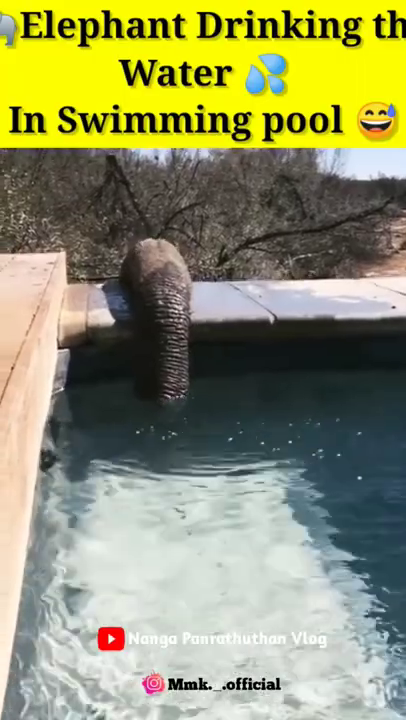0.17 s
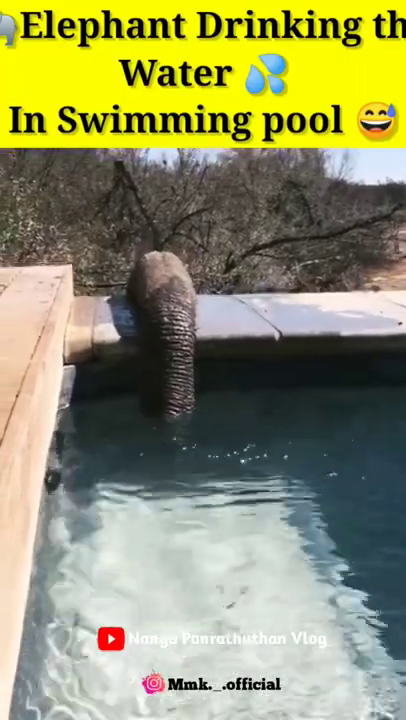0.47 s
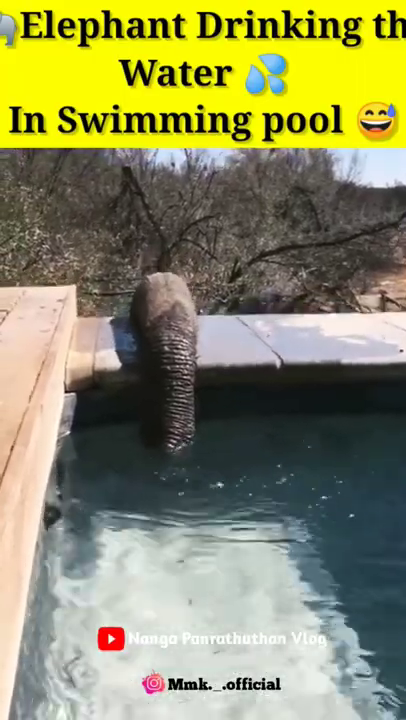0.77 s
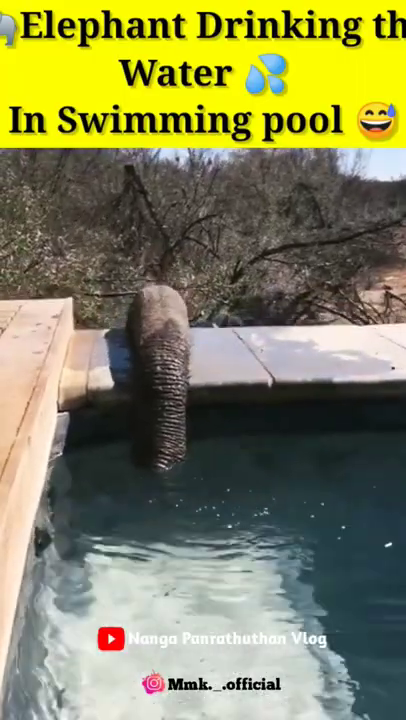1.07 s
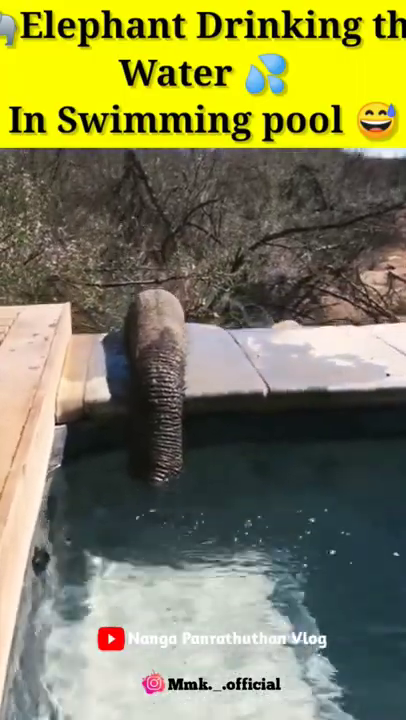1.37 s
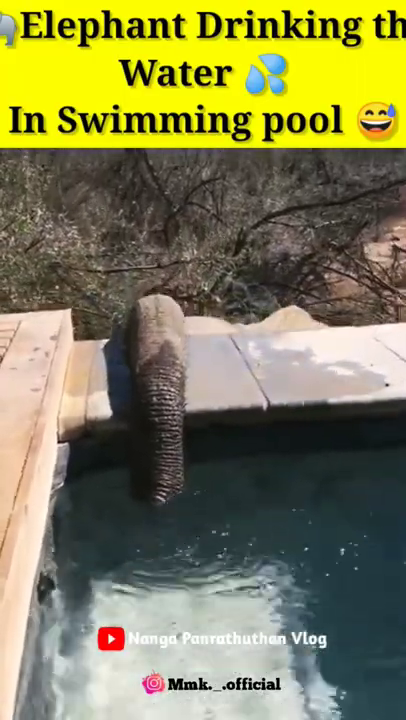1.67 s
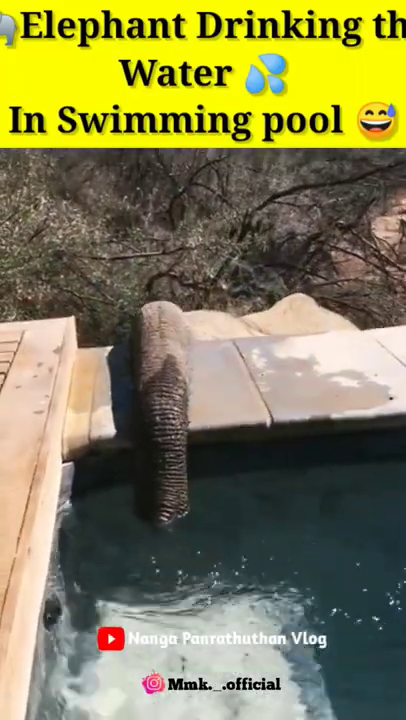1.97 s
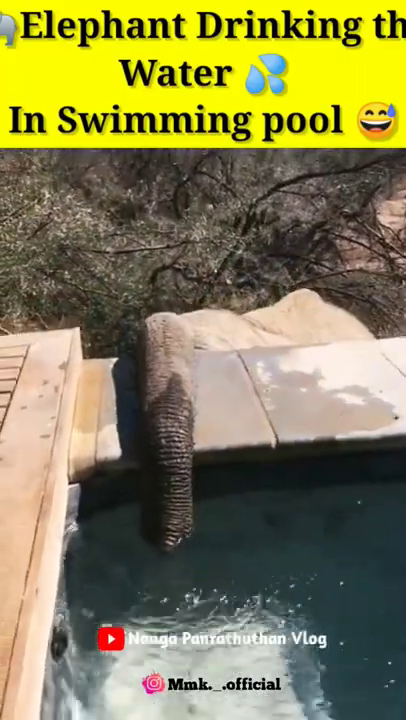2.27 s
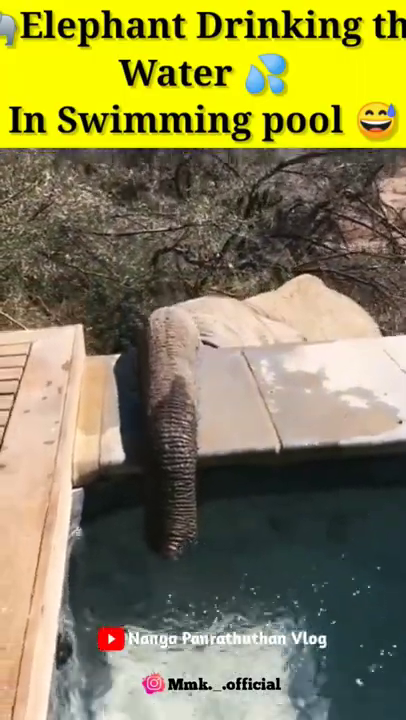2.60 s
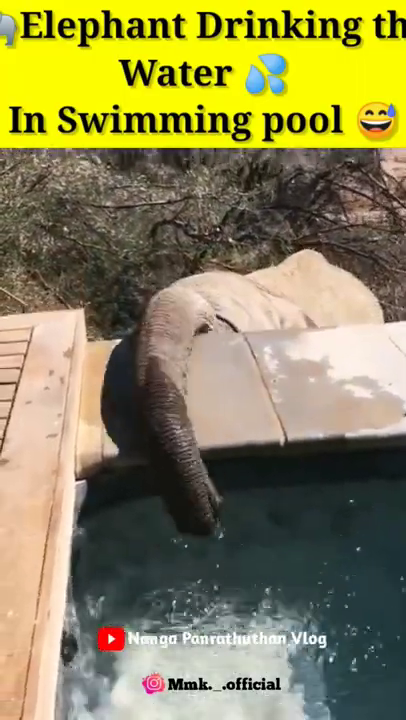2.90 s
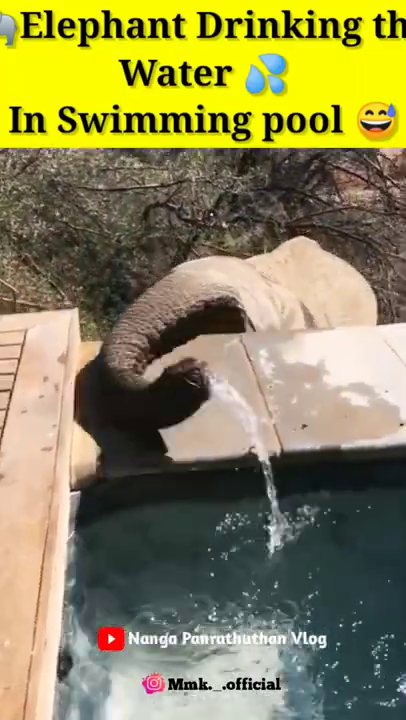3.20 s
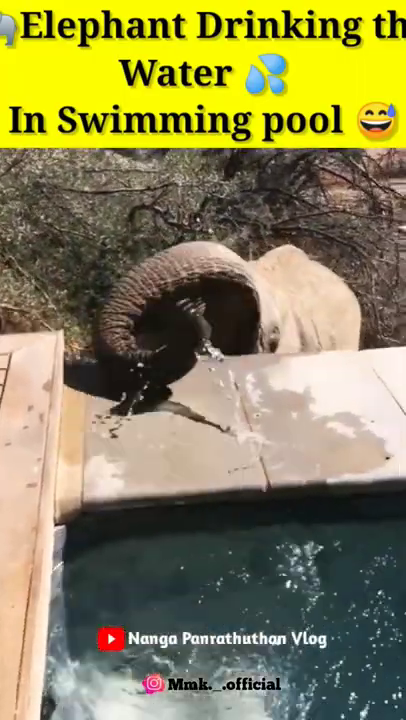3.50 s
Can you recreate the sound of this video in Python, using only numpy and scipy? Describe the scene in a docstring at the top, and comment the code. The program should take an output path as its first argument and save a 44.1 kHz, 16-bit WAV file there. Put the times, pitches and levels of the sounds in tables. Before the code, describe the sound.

Shrill cicada buzz throughout, with faint gurgles, soft wind bumps and a final splashing of water.

```python
"""Cicadas drone all round in dry bush, over faint gurgles and a plop from a pool; light wind bumps
the microphone. An elephant's trunk stirs the water, then lifts out: one big bubble, and water spills
and spatters on the pool and the stone edge. Cicadas are trains of clicks plus hiss, wind is low noise,
water is ringing grains and gliding tones blurred by pool echoes. One microphone, both channels alike."""
import sys
import numpy as np
from scipy import signal
from scipy.fft import rfft, irfft, next_fast_len
from scipy.io import wavfile

SR = 44100
rng = np.random.default_rng(int(sys.argv[2]) if len(sys.argv) > 2 else 0)


def int16_out(signal):
    """Quantize to a 16-bit WAV file."""
    q = np.round(np.clip(np.atleast_2d(signal).T, -1, 1) * 32767)
    wavfile.write(sys.argv[1], SR, q.astype(np.int16))


N = 160965  # length in samples

# Colour tables are relative: the shaped noise is scaled to rms 1 before its level is set.
# Loudness of the whole chorus at the microphone: (t/s, rms level/dB)
CHORUS_LEVEL = [(0.04, -33), (0.68, -33.5), (1.2, -34), (2.0, -33), (2.43, -34.5), (3.6, -35)]
# Colour of the near singers' tymbals: (f/Hz, relative density/dB)
NEAR_CHORUS_COLOUR = [(5600, -28.5), (6000, -1), (6500, 1), (6950, -2.5), (7300, -15.5)]
# Colour of the far chorus: (f/Hz, relative density/dB)
FAR_CHORUS_COLOUR = [(4600, -38.5), (4830, -38), (4912, -20.5), (5010, -42.5), (5300, -17), (5450, -11),
                     (5600, -16), (5780, -4.5), (5950, -12.5), (6150, 1), (6350, -8), (6500, -2),
                     (6680, -4.5), (6950, -5.5), (7160, -0.5), (7350, -4), (7600, -7), (7900, -22),
                     (8050, -10), (8350, -13.5), (8550, -19), (9020, -17.5), (9300, -24.5), (10400, -41.5),
                     (12300, -27.5), (14000, -42), (15500, -50)]
# Colour of the outdoor noise floor: (f/Hz, relative density/dB)
AIR_COLOUR = [(150, -0.5), (400, -5), (1000, -9.5), (1700, -5.5), (2400, -11.5), (2900, -13.5),
              (4000, -13.5), (5000, -28)]
# Two faint tones: (centre f/Hz, level before the lift and waver/dB)
FAINT_TONES = [(656.8, -76.5), (1717, -76)]
# Water stirring at the trunk, before waver and echoes: (t/s, rms level/dB)
GURGLE_LEVEL = [(0.04, -75.5), (0.45, -102), (0.71, -76), (0.86, -70.5), (1.16, -59), (1.33, -67),
                (1.74, -62.5), (2.09, -71), (2.2, -73.5), (2.43, -61), (2.85, -71), (3.1, -73.5)]
# Plops, before echoes: (onset t/s, tone level/dB, starting f/Hz, t60/s, glide/octaves per s,
# tick level relative to the tone level/dB)
PLOP_EVENTS = [(.07, -60.5, 550, 0.26, -0.5, -20), (1.363, -53, 2480, 0.068, -0.5, 13),
               (1.365, -54.5, 993, 0.07, 1, -10), (1.391, -53, 2910, .03, 1, 8),
               (1.618, -46.5, 4080, 0.024, 4, -20), (2.052, -48.5, 438, 0.043, 10, -20),
               (2.34, -47, 1160, 0.031, 2, -1), (2.374, -35, 1303, 0.05, 6, 2),
               (2.385, -17.5, 1500, 0.02, -15.5, -8), (2.408, -41, 1440, 0.065, 41, -20),
               (2.487, -45, 1873, 0.063, 4, 10), (2.489, -45.5, 836, 0.026, -14, 9.5),
               (2.592, -47.5, 2360, 0.016, -2, 5.5), (2.734, -37.5, 2170, 0.02, 12, -15),
               (2.781, -29, 1878, 0.042, -16.5, -11), (3.016, -44, 3470, 0.017, 9, -4),
               (3.179, -35.5, 2700, 0.019, 5, -12), (3.191, -31, 2320, 0.012, -18, -10),
               (3.209, -29, 1940, 0.016, 10, 6), (3.209, -26.5, 13600, 0.0071, 0.1, 1.5),
               (3.216, -32.5, 4350, 0.022, -12, 3), (3.24, -33, 4700, 0.0065, 14, -24),
               (3.246, -43, 1300, 0.1, 25.5, -15), (3.258, -33, 4080, 0.022, 2, -16),
               (3.28, -34.5, 1960, 0.029, -3, 3), (3.311, -26, 2306, 0.057, 1.5, -5),
               (3.315, -28.5, 1048, 0.036, -1, 0), (3.326, -27.5, 1652, 0.067, -3, -21),
               (3.33, -42.5, 456, 0.099, 5.5, -20), (3.337, -24.5, 1930, .04, -3, -2),
               (3.362, -30.5, 1620, 0.039, 4, 4), (3.371, -32, 3490, 0.018, 3, -4),
               (3.379, -23, 13000, 0.006, -9, -12), (3.404, -26, 1940, 0.023, -9, -10),
               (3.437, -34, 1340, 0.038, -4.5, -16), (3.581, -22.5, 2100, 0.021, -23, -21),
               (3.612, -41, 580, 0.057, 5, -10), (3.625, -27.5, 1745, 0.044, -27.5, -1)]
# Wind on the microphone, before lumps and top lift: (t/s, rms level/dB)
WIND_LEVEL = [(.04, -70), (.5, -70), (.66, -60), (.72, -66), (.81, -57), (.94, -70), (1.04, -42),
              (1.11, -63), (1.27, -70), (1.31, -54), (1.53, -55), (1.575, -68), (1.62, -50), (1.69, -58),
              (1.88, -50), (1.99, -54), (2.04, -66), (2.16, -62), (2.22, -48), (2.4, -44), (2.45, -50),
              (2.55, -42), (2.67, -52), (2.71, -66), (2.8, -75), (2.85, -42), (2.89, -60), (2.92, -51),
              (3.04, -49), (3.08, -72), (3.2, -50), (3.3, -78)]
# Colour of the wind: (f/Hz, relative density/dB)
WIND_NOISE_COLOUR = [(12, -95), (20, -14), (54, 13), (97, 5.5), (152, -6.5), (248, -22), (400, -28.5),
                     (520, -64)]
# Extra level of the wind's upper part: (t/s, level/dB)
WIND_TOP_LEVEL = [(1.3, 2), (1.6, -2), (2.0, -3), (2.2, 7.5), (2.7, 6.5), (2.85, 6.5)]
# Single buffets of wind: (middle t/s, envelope peak level/dB, f/Hz, half length/cycles)
WIND_BUFFETS = [(1.036, -38, 66, 0.84), (1.037, -40.5, 169, 0.74), (1.366, -36, 53.7, 1.4),
                (1.621, -38, 66, 1.35), (1.781, -40, 54, 1.2), (2.361, -29.5, 69, 0.93),
                (2.357, -30.5, 148.5, 0.74), (2.525, -25, 110, 0.83), (2.559, -34.5, 75, 1.4),
                (2.548, -33.5, 170, 0.79), (2.847, -28, 67, 0.71), (3.207, -41.5, 69, 0.81)]
# Spilling water, before the drops trim and echoes: (t/s, rms level/dB)
SPILL_LEVEL = [(3.05, -64), (3.13, -55), (3.19, -48), (3.214, -42.5), (3.24, -38), (3.304, -40),
               (3.342, -36), (3.428, -47), (3.52, -42), (3.65, -39)]
# Fine spray, before the spray trim, waver and echoes: (t/s, rms level/dB)
SPRAY_LEVEL = [(3.06, -75), (3.2, -56.5), (3.21, -41.5), (3.226, -53), (3.306, -49), (3.316, -42),
               (3.322, -46.5), (3.572, -39.5), (3.65, -38.5)]
# Colour of the spray: (f/Hz, relative density/dB)
SPRAY_NOISE_COLOUR = [(1500, 3), (2500, 0.5), (4000, 3), (7000, -2.5), (10500, -4), (12700, -7),
                      (15500, -7.5)]
# The big bubble as the trunk leaves the water: (t/s, f/Hz, level before the bubble lift/dB)
BUBBLE_GLIDE = [(3.228, 415.5, -83), (3.233, 443, -33.5), (3.239, 576, -33.5), (3.246, 621, -24.5),
                (3.252, 715, -34), (3.258, 773, -43.5), (3.266, 720, -39.5), (3.275, 736, -42),
                (3.29, 720, -67)]

# Cicadas: the two spreads are fractions of the click rate
CLICKS_PER_S, RATE_SPREAD, RATE_WANDER = 381.5, .008, .008
CLICK_JITTER_DB, SINGER_SWELL_DB = -0.5, 4.5
FAR_CHORUS_DB, PATCHES_DB = 0.5, 1  # far level relative to near; depth of each patchiness
AIR_DB = -65.5
TONES_LIFT_DB, TONES_WAVER_DB, TONES_WAVER_HZ = 4, 3.5, 6
TONES_FADE_S, TONES_FADE_LENGTH_S = 1.0, .15
GURGLES_PER_S, GURGLE_LOW_HZ, GURGLE_HIGH_HZ, GURGLE_CYCLES = 2500, 893, 2617, 47
GRAIN_ATTACK_CYCLES = 0.52
TICK_T60_S, TICK_LOW_HZ, TICK_HIGH_HZ = 0.013, 1300, 4970
PLOP_ATTACK_S, PLOP_ROUGH, PLOP_ROUGH_HZ = 0.00088, 0.5, 249
WIND_LUMPS_DB, WIND_TOP_HZ = 2.5, 93
DROPS_PER_S, DROP_LOW_HZ, DROP_HIGH_HZ, DROP_CYCLES, DROPS_DB = 1800, 949, 5220, 24, -2.5
SPRAY_PER_S, SPRAY_BODY_DB = 7000, 2.5
BUBBLE_LIFT_DB = 3
POOL_DELAY_S, POOL_T60_S, POOL_DB = 0.0052, 0.095, -10
CUTOFF_HZ = 15800


def amp(db):
    """dB to gain."""
    return 10 ** (np.asarray(db, float) / 20)


def rms_one(x):
    """Scale to rms 1."""
    return x / np.sqrt(np.mean(x ** 2) + 1e-20)


def curve(rows, column=1, **ends):
    """A table column joined by straight lines in time."""
    rows = np.array(rows)
    return np.interp(np.arange(N) / SR, rows[:, 0], rows[:, column], **ends)


def filtered(x, hz, kind):
    """Second-order Butterworth filter."""
    return signal.sosfilt(signal.butter(2, hz, kind, fs=SR, output="sos"), x)


def colour(x, points):
    """Shape a signal by a spectrum, falling 30 dB in the octave outside it; rms 1."""
    size = next_fast_len(N + 4096)
    hz, db = np.transpose(points)
    hz = np.r_[hz[0] / 2, hz, hz[-1] * 2]
    db = np.r_[db[0] - 30, db, db[-1] - 30]
    log_f = np.log(np.arange(size // 2 + 1) * SR / size + 1)
    gain = amp(np.interp(log_f, np.log(hz), db))
    return rms_one(irfft(rfft(x, size) * gain, size)[:N])


def drift(rate):
    """Slow random wander with spread 1, noise low-passed near rate (Hz)."""
    step = 40  # computed on every 40th sample, then joined up
    r = np.exp(-2 * np.pi * rate * step / SR)
    noise = rng.standard_normal(N // step + 2002)
    slow = signal.lfilter([1], [1, -2 * r, r * r], noise)[2000:]  # drop the filter's start
    return np.interp(np.arange(N) / step, np.arange(len(slow)), rms_one(slow - slow.mean()))


def random_clicks(rate, uneven_db):
    """Clicks at random moments, of either sign and uneven size."""
    sizes = amp(uneven_db * np.minimum(rng.exponential(1, N), 4))
    return sizes * rng.choice([-1, 1], N) * (rng.random(N) < rate / SR)


def grains(rate, low_hz, high_hz, cycles, uneven_db, patchy_db, patch_rate, count=20):
    """Random clicks dealt to pitched resonators swell and ring; each pitch comes and goes; rms 1."""
    clicks = random_clicks(rate, uneven_db)
    dealt = rng.integers(0, count, N)
    out = np.zeros(N)
    for k, hz in enumerate(np.geomspace(low_hz, high_hz, count)):
        w = 2 * np.pi * hz / SR
        r = amp(-60 * hz / (cycles * SR))  # down 60 dB after the given cycles
        struck = clicks * (dealt == k) * amp(patchy_db * drift(patch_rate)) + 1e-18
        ring = signal.lfilter([0, np.sin(w)], [1, -2 * r * np.cos(w), r * r], struck)
        # a second, faster-dying resonance softens the attack
        soft = np.exp(-hz / (GRAIN_ATTACK_CYCLES * SR))
        swelling = signal.lfilter([1, 0, -1], [1, -2 * soft * np.cos(w), soft * soft], ring)
        out += np.sqrt(w) * (1 - soft) * swelling
    return rms_one(out)


def near_cicadas(count=9):
    """Near singers click at almost the same rate, which leaves ridges in the song."""
    near = np.zeros(N)
    for offset in np.linspace(-1, 1, count):
        rate = CLICKS_PER_S * (1 + RATE_SPREAD * offset + RATE_WANDER * drift(30.0))
        phase = np.cumsum(rate / SR) + rng.random()
        at = np.flatnonzero(np.diff(np.floor(phase)) > 0)  # one click per whole turn
        click_db = CLICK_JITTER_DB * rng.standard_normal(N) + SINGER_SWELL_DB * drift(1.0)
        near[at] += amp(click_db)[at]
    return colour(near, NEAR_CHORUS_COLOUR)


def far_cicadas():
    """Distant singers blur into hiss whose bands swell and fade independently."""
    far = np.zeros(N)
    edges = np.geomspace(4000, 16500, 25)
    for low, high in zip(edges, edges[1:]):
        band = filtered(rng.standard_normal(N), [low, high], "band")
        far += band * amp(PATCHES_DB * (drift(1.37) + drift(3.1)))
    return colour(far, FAR_CHORUS_COLOUR)


def cicadas():
    """Near and far singers share one chorus loudness at the microphone."""
    return amp(curve(CHORUS_LEVEL)) * rms_one(near_cicadas() + amp(FAR_CHORUS_DB) * far_cicadas())


def outdoor_air():
    """Steady coloured noise under everything."""
    return amp(AIR_DB) * colour(rng.standard_normal(N), AIR_COLOUR)


def faint_tones():
    """Two sines wavering in pitch and level, which fade out early."""
    tones = np.zeros(N)
    for hz, db in FAINT_TONES:
        level = amp(db + TONES_LIFT_DB + TONES_WAVER_DB * drift(8.0))
        pitch = hz + TONES_WAVER_HZ * drift(15.0)
        tones += level * np.sin(2 * np.pi * np.cumsum(pitch) / SR)
    t = np.arange(N) / SR
    return tones * np.clip((TONES_FADE_S - t) / TONES_FADE_LENGTH_S + 1, 0, 1)


def gurgles():
    """Water stirred at the trunk: dense, long-ringing grains."""
    stirred = grains(GURGLES_PER_S, GURGLE_LOW_HZ, GURGLE_HIGH_HZ, GURGLE_CYCLES,
                     uneven_db=1.8, patchy_db=4.84, patch_rate=7.6)
    return amp(curve(GURGLE_LEVEL) + 2.0 * drift(10.3)) * stirred


def plops():
    """Each plop is a noise tick and a rough dying tone that may glide."""
    out = np.zeros(N + SR)
    t = np.arange(SR // 5) / SR
    noise = rng.standard_normal((len(PLOP_EVENTS), 2, len(t)))
    ticks = filtered(noise[:, 0], [TICK_LOW_HZ, TICK_HIGH_HZ], "band")
    roughs = rms_one(filtered(noise[:, 1], PLOP_ROUGH_HZ, "low"))
    for (s, db, hz, t60, rise, tick_db), tick, rough in zip(PLOP_EVENTS, ticks, roughs):
        pitch = hz * 2 ** (rise * np.minimum(t, t60 / 2))  # the glide stops at half the t60
        tone = np.sin(2 * np.pi * np.cumsum(pitch) / SR) * amp(-60 * t / t60)
        tone *= (1 - np.exp(-t / PLOP_ATTACK_S)) * (1 + PLOP_ROUGH * rough)
        dying_tick = amp(tick_db - 60 * t / TICK_T60_S) * tick
        i = int(s * SR)
        out[i:i + len(t)] += amp(db) * (tone + dying_tick)
    return out[:N]


def wind():
    """Lumpy low noise on the microphone, its upper part lifted or lowered in time."""
    level = amp(curve(WIND_LEVEL) + WIND_LUMPS_DB * drift(10.5))
    rumble = level * colour(rng.standard_normal(N), WIND_NOISE_COLOUR)
    top = filtered(rumble, WIND_TOP_HZ, "high")
    return rumble + (amp(curve(WIND_TOP_LEVEL)) - 1) * top


def buffets():
    """Bumps of wind on the microphone: a short low sine under a bell-shaped envelope."""
    t = np.arange(N) / SR
    out = np.zeros(N)
    for s, db, hz, cycles in WIND_BUFFETS:
        bell = np.exp(-((t - s) * hz / cycles) ** 2)
        out += amp(db) * bell * np.sin(2 * np.pi * hz * (t - s) + 1.0)
    return out


def spilling_drops():
    """Falling drops: grains of very uneven size that ring briefly."""
    drops = grains(DROPS_PER_S, DROP_LOW_HZ, DROP_HIGH_HZ, DROP_CYCLES,
                   uneven_db=3.8, patchy_db=4.0, patch_rate=25.0)
    return amp(curve(SPILL_LEVEL, left=-120) + DROPS_DB) * drops


def fine_spray():
    """Tiny spatters: dense random clicks, coloured but without pitch."""
    fizz = colour(random_clicks(SPRAY_PER_S, uneven_db=3.5), SPRAY_NOISE_COLOUR)
    return amp(curve(SPRAY_LEVEL, left=-120) + SPRAY_BODY_DB + 1.8 * drift(39.0)) * fizz


def big_bubble():
    """One sine that swells and rises in pitch, then dies, as the trunk leaves the water."""
    level = amp(curve(BUBBLE_GLIDE, column=2, left=-120, right=-120) + BUBBLE_LIFT_DB)
    return level * np.sin(2 * np.pi * np.cumsum(curve(BUBBLE_GLIDE)) / SR)


def pool_echoes(dry):
    """Short dense echoes off water and walls: a decaying noise tail of unit energy."""
    t = np.arange(SR // 4) / SR
    tail = rng.standard_normal(len(t)) * amp(-60 * t / POOL_T60_S) * (t > POOL_DELAY_S)
    return amp(POOL_DB) * signal.fftconvolve(dry, tail / np.linalg.norm(tail))[:N]


def scene():
    """All sources at one microphone, the same in both channels; only the water gets echoes."""
    water = gurgles() + plops() + spilling_drops() + fine_spray() + big_bubble()
    bush = cicadas() + outdoor_air() + faint_tones()
    mono = bush + wind() + buffets() + water + pool_echoes(water)
    return np.array([mono, mono])


def record(dry):
    """A steep low-pass removes the top, 60 dB down from the cutoff upward."""
    return signal.sosfilt(signal.cheby2(14, 60, CUTOFF_HZ, fs=SR, output="sos"), dry)


dry = scene()
out = record(dry)
int16_out(out)
```